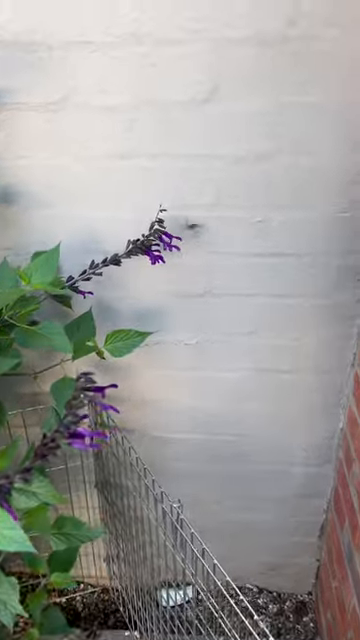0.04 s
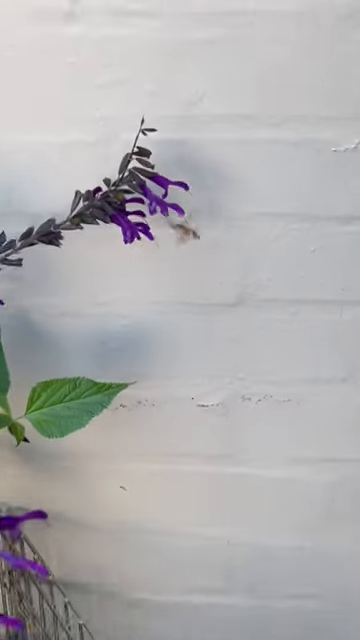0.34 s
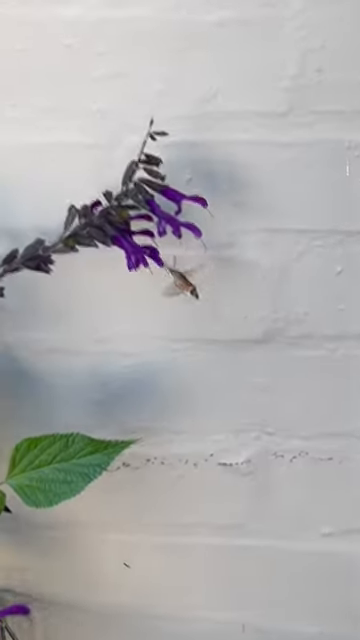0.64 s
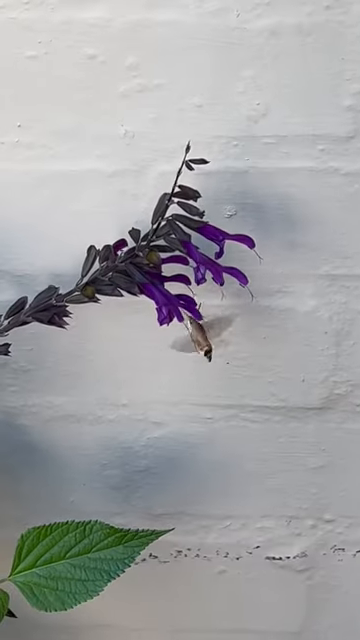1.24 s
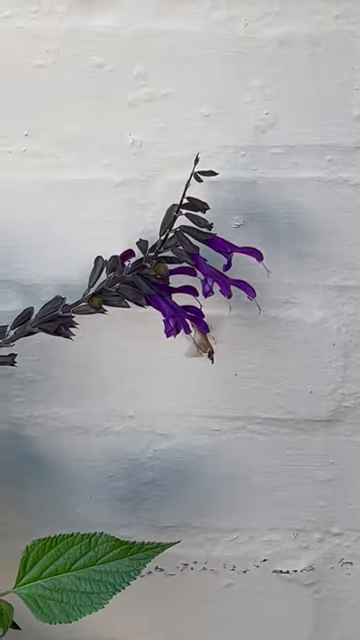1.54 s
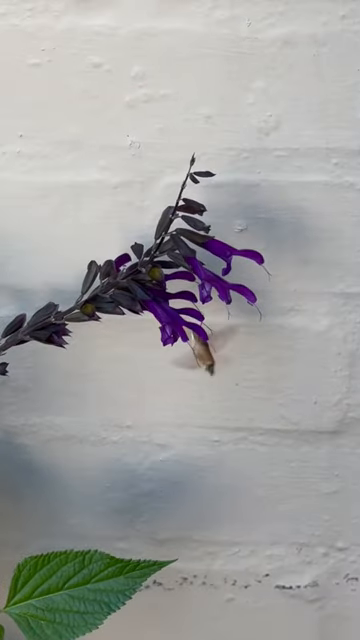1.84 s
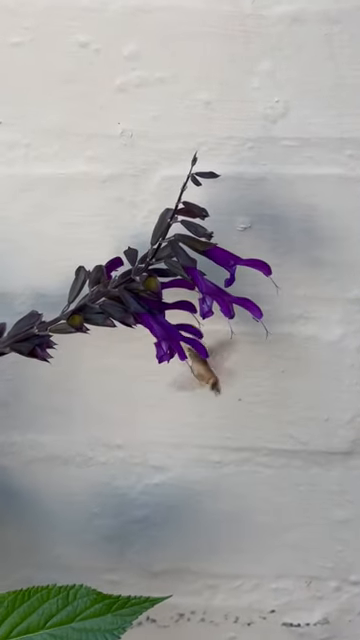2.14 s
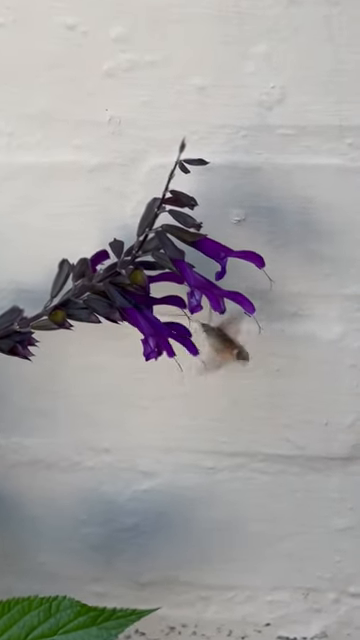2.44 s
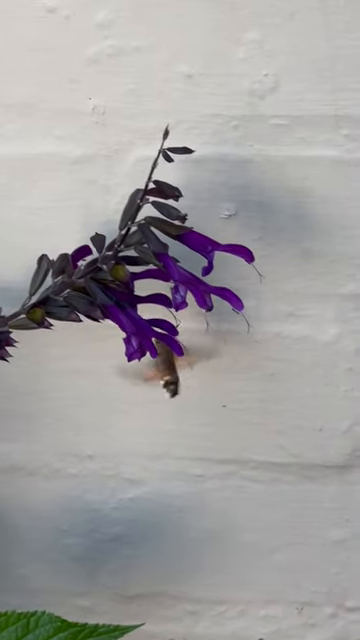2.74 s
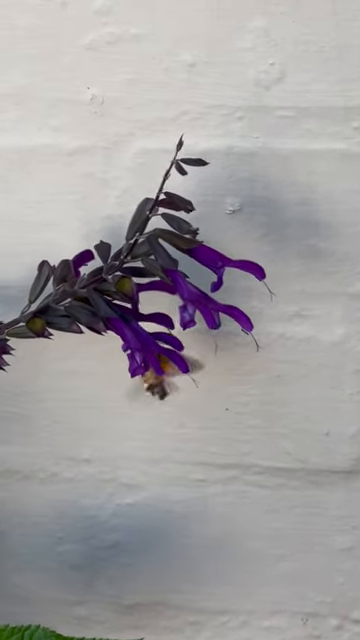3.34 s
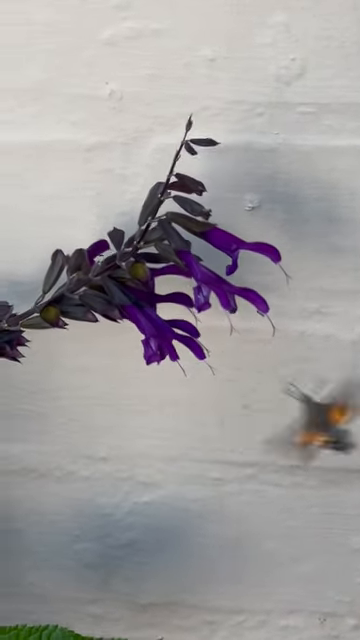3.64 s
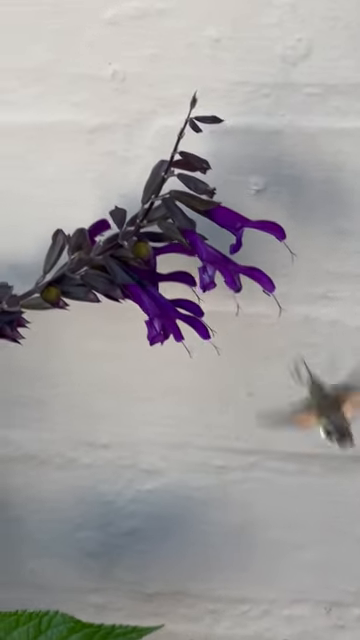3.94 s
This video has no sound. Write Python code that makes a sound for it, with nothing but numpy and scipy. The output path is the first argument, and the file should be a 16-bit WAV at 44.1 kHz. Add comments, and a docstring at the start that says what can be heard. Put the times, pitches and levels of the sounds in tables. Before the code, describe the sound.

A steady, deep rumble of far traffic fills a quiet garden beside a wall. After one small bump on the microphone, a hovering moth hums close by in short, soft swells toward the end, and leaves rustle very faintly.

```python
"""Hawk-moth in a quiet garden

Beside a brick wall lies a bed of distant traffic: deep engine rumble, a slowly swelling tyre wash and
one engine idling. A far machine hums and birds chirp very faintly. A finger bumps the microphone once.
Up close, leaves rustle and a hawk-moth hovers at a flower: its beating wings hum softly and now and
then brush the petals."""
import sys
import numpy as np
from scipy import signal
from scipy.fft import rfft, irfft
from scipy.io import wavfile
from scipy.ndimage import uniform_filter1d

SR = 44100
rng = np.random.default_rng(int(sys.argv[2]) if len(sys.argv) > 2 else 0)


def persist_wave(psi):
    """Save psi, clipped to +-1, as 16-bit WAV."""
    counts = np.round(np.clip(psi, -1, 1) * 32767).astype(np.int16)
    wavfile.write(sys.argv[1], SR, np.atleast_2d(counts).T)


N = 176400
TIME = np.arange(N) / SR
BINS_HZ = np.maximum(np.arange(N // 2 + 1) * SR / N, 1)

# stereo image beside the wall: f/Hz, left-right correlation, left minus right/dB, left lead/rad
WALL_IMAGE = [(30, .9993, -.15, 0), (65, .9988, -.3, 0), (120, .994, -1, 0), (170, .98, -1.8, 0),
              (240, .94, -2.7, -.05), (340, .72, .2, -.1), (450, .73, -.8, 0), (560, .87, -1.7, .25),
              (780, .69, -2.5, .85), (980, .43, 0, -.1), (1200, .63, -.2, .65), (1380, .05, -.6, -.3),
              (1550, .68, -4, .3), (1900, .98, -.2, 0), (2500, .997, 0, 0), (4800, .95, 0, 0),
              (5500, .72, -.2, -.9), (8000, .78, -.4, -1.2), (14000, .62, -.6, -1.2)]
# colour of the hiss: f/Hz, relative level/dB
HISS_SPECTRUM = [(1000, 3), (3500, 5), (5500, 0.5), (7000, 1), (8500, -0.5), (10500, -5.5), (13000, -5.5),
                 (15000, -15.5)]
# colour of the engine rumble: f/Hz, relative level/dB
RUMBLE_SPECTRUM = [(15, -51), (24, -27), (32, -12), (41, -8.5), (54, 2.5), (65, -9.5), (74, -3.5),
                   (98, -12.5), (128, -9), (165, -19.5), (205, -23.5), (320, -37), (600, -78), (900, -120)]
# fader ride of the rumble: t/s, level/dB
RUMBLE_LEVEL = [(0, -40), (1, -41), (2.2, -41), (2.75, -39), (3.2, -40), (4, -39.5)]
# colour of the tyre wash: f/Hz, relative level/dB
TYRE_SPECTRUM = [(120, -7), (300, -9.5), (430, -6), (510, -4), (555, -0.5), (700, -1.5), (800, 1),
                 (850, -3), (1150, -6), (1340, -11), (1580, -11), (1850, -20), (2300, -26.5), (3100, -41.5),
                 (4500, -91.5), (8000, -80.5)]
# fader ride of the tyre wash: t/s, level/dB
TYRE_LEVEL = [(0, -50.5), (.8, -50), (1.3, -50), (2.2, -49.5), (2.7, -48.5), (3.3, -48.5), (4, -48.5)]
# single far engines swelling: peak t/s, half length/s, level/dB, centre f/Hz, width/octaves
ENGINE_SWELLS = [(1.906, .22, -51, 132, 0.14), (2.72, 0.33, -44, 61, 0.11)]
# tones of the far machine: f/Hz, relative level/dB
MACHINE_TONES = [(183, -1), (350, -8), (398, -3.5)]
# fader ride of the machine: t/s, level/dB
MACHINE_LEVEL = [(0, -63), (.6, -58), (1, -69.5), (1.6, -66), (2, -59), (2.5, -73.5), (4, -66.5)]
# far bird chirps: peak t/s, half length/s, start f/Hz, end f/Hz, level/dB
CHIRPS = [(.19, .025, 3260, 3960, -92), (1.635, .035, 3940, 4160, -86), (1.87, .018, 3520, 3450, -89),
          (3.79, .04, 3400, 3200, -89)]
# modes of the microphone's case: f/Hz, relative level/dB
CASE_MODES = [(170, 4), (390, -5.5)]
# leaf rustles: peak t/s, attack/s, decay/s, level/dB, centre f/Hz, width/octaves
RUSTLES = [(.032, .001, .004, -76, 5000, 0.48), (.075, 0.049, 0.065, -85.5, 3670, 0.23),
           (.205, .015, .04, -94, 4020, 0.33), (.68, .04, .08, -93, 8200, 0.12),
           (1.635, 0.025, .03, -94, 4000, 0.26), (2.95, 0.15, 0.16, -89, 8330, 0.13),
           (3.07, 0.028, .03, -86.5, 4300, 0.67), (3.25, 0.056, 0.044, -84, 5440, 0.89),
           (3.412, 0.02, 0.017, -78.5, 8040, 0.23), (3.555, 0.05, .05, -86, 3500, .4),
           (3.751, 0.16, .15, -90, 3600, 0.54)]
# wings touching the petals: start t/s, length/s, level/dB
BRUSHES = [(1.14, .17, -89.8), (1.31, .13, -88.5), (1.37, .026, -83.5), (1.445, .05, -82),
           (1.53, .235, -82.3), (1.765, .085, -92), (1.85, .06, -87), (1.915, .04, -83.5),
           (1.975, .095, -83.8), (2.14, .035, -90.5), (2.64, .11, -95), (2.75, .05, -87.5), (2.8, .3, -88),
           (3.12, .16, -90.5), (3.37, .1, -86.5)]
# colour of wing on petal: f/Hz, relative level/dB
BRUSH_SPECTRUM = [(1500, -26), (3500, -5.5), (6700, -6.5), (7900, 4.5), (9400, -0.5), (10300, 2),
                  (11200, -2), (13000, -2.5), (15000, -7)]
# the moth's wingbeat rate: t/s, f/Hz
WINGBEAT = [(0, 74), (1.7, 75), (2.6, 72), (2.97, 74), (3.03, 81), (3.08, 81), (3.11, 73), (3.25, 74),
            (3.33, 78), (3.58, 78), (3.62, 72), (4, 72)]
# fader ride of the wing hum as the moth turns and nears: t/s, level/dB
WING_LEVEL = [(0, -75.5), (2.2, -70), (2.5, -64), (2.63, -53.5), (2.8, -71.5), (2.93, -67), (3.03, -51),
              (3.18, -47), (3.29, -60), (3.43, -55), (3.58, -53), (3.69, -47.5), (3.8, -65), (4, -60)]
# partials of the wing hum: harmonic number, relative level/dB
WING_PARTIALS = [(1, -4), (2, -11), (3, 1.5), (4, -21)]


def from_db(db):
    """Decibels to gain."""
    return 10 ** (np.asarray(db) / 20)


def unit_rms(x):
    """Scale to an rms of 1."""
    return x / np.sqrt(np.mean(x ** 2) + 1e-20)


def in_time(rows):
    """A (t/s, value) curve at every sample."""
    return np.interp(TIME, *np.transpose(rows))


def over_hz(rows):
    """Each value column of an (f/Hz, ...) table at every frequency bin."""
    hz, *columns = np.transpose(rows)
    return [np.interp(np.log(BINS_HZ), np.log(hz), c) for c in columns]


def phase_of(hz):
    """Running phase of a moving pitch."""
    return 2 * np.pi * np.cumsum(hz) / SR


def drift(rate_hz):
    """Smooth random modulation of rms 1, rolling off above rate_hz."""
    slow = irfft(rfft(rng.standard_normal(N)) / (1 + (BINS_HZ / rate_hz) ** 2), N)
    return unit_rms(slow - slow.mean())


def hump_db(hz, octaves):
    """A smooth band-pass curve around hz."""
    return -40 * np.log10(1 + (np.log2(BINS_HZ / hz) / octaves) ** 2 / 2)


def steadied(x, span_s):
    """Level out the swells of a stereo noise that are slower than span_s."""
    return x / np.sqrt(uniform_filter1d(np.mean(x ** 2, axis=0), int(span_s * SR)))


def garden_noise(colour_db):
    """Stereo noise of rms 1 in the given colour; the wall tints the two sides differently."""
    alike, balance_db, lead = over_hz(WALL_IMAGE)
    mid, side = rfft(rng.standard_normal((2, N)))
    sides = np.array([[1], [-1]])
    pair = np.sqrt(1 + alike) * mid + sides * np.sqrt(1 - alike) * side
    gain = from_db(colour_db + sides * balance_db / 2)
    return unit_rms(irfft(pair * gain * np.exp(.5j * sides * lead), N))


def hiss(level_db=-85.5):
    """A faint, even hiss under everything."""
    return from_db(level_db) * garden_noise(*over_hz(HISS_SPECTRUM))


def traffic():
    """Many far engines merge into a steady rumble under the wash of their tyres."""
    engines = steadied(garden_noise(*over_hz(RUMBLE_SPECTRUM)), span_s=.17)
    tyres = garden_noise(*over_hz(TYRE_SPECTRUM))
    return from_db(in_time(RUMBLE_LEVEL)) * engines + from_db(in_time(TYRE_LEVEL)) * tyres


def idling_engine(firing_hz=64.5, level_db=-44.5, wander_hz=1.7, waver_db=2.3):
    """The firing note of a far engine drones, unsteady on the air."""
    tone = np.sin(phase_of(firing_hz + wander_hz * drift(9.8)))
    return from_db(level_db) * unit_rms(tone * from_db(waver_db * drift(3.1)))


def engine_swells():
    """Now and then one engine booms up out of the rumble."""
    out = 0
    for peak, half, db, hz, octaves in ENGINE_SWELLS:
        swell = np.exp(-((TIME - peak) / half) ** 2)
        boom = steadied(garden_noise(hump_db(hz, octaves)), span_s=.12)
        out = out + from_db(db) * swell * boom
    return out


def machine(wander_hz=.88):
    """A far machine hums in a few thin tones that fade in and out on the air."""
    hum = 0
    for hz, db in MACHINE_TONES:
        tone = np.sin(phase_of(hz + wander_hz * drift(3.7)))
        hum = hum + from_db(db) * unit_rms(tone)
    return from_db(in_time(MACHINE_LEVEL)) * hum


def birds(waver_hz=170):
    """Very faint gliding chirps, blurred by distance."""
    out = 0
    for peak, half, start_hz, end_hz, db in CHIRPS:
        glide = np.interp(TIME, [peak - half, peak + half], [start_hz, end_hz])
        tone = np.sqrt(2) * np.sin(phase_of(glide + waver_hz * drift(150)))
        swell = np.exp(-((TIME - peak) / half) ** 2)
        out = out + from_db(db) * swell * tone
    return out


def finger_bump(start_s=.031, gain_db=-34, t60_s=.045):
    """A finger knocks the microphone's case, whose modes die away quickly."""
    age = np.maximum(TIME - start_s, 0)
    ring = sum(from_db(db) * np.sin(2 * np.pi * hz * age) for hz, db in CASE_MODES)
    return from_db(gain_db - 60 * age / t60_s) * ring


def leaves(grain_db=2):
    """Leaves slide over each other in short, grainy swishes."""
    out = 0
    for peak, attack, decay, db, hz, octaves in RUSTLES:
        swell = np.exp(-np.maximum((peak - TIME) / attack, (TIME - peak) / decay))
        grainy_gain = from_db(db + grain_db * drift(200))
        out = out + swell * grainy_gain * garden_noise(hump_db(hz, octaves))
    return out


def wing_brushes(phase, fade_s=.016, sharpness=.42, rough_db=1.3):
    """While a wing tip reaches the petals, each beat gives one tiny scuff."""
    contact = 0
    for start, length, db in BRUSHES:
        inside_s = np.minimum(TIME - start, start + length - TIME)
        contact = contact + from_db(db) * np.clip(inside_s / fade_s + .5, 0, 1)
    pulses = np.exp(sharpness * np.cos(phase))
    scuffs = unit_rms(pulses * from_db(rough_db * drift(60)))
    return contact * scuffs * garden_noise(*over_hz(BRUSH_SPECTRUM))


def wing_hum(phase, waver_db=2.6, flutter_depth=.42, flutter_hz=42):
    """The beating wings push out a few soft harmonics, each smeared by uneven strokes."""
    hum = 0
    for harmonic, db in WING_PARTIALS:
        flutter = flutter_depth * drift(flutter_hz) * np.cos(harmonic * phase)
        partial = from_db(waver_db * drift(flutter_hz)) * np.sin(harmonic * phase)
        hum = hum + from_db(db) * (partial + flutter)
    return from_db(in_time(WING_LEVEL)) * hum


def moth(jitter_hz=1.3):
    """One slightly unsteady wingbeat drives both the hum and the scuffs."""
    phase = phase_of(in_time(WINGBEAT) + jitter_hz * drift(30))
    return wing_hum(phase) + wing_brushes(phase)


def scene():
    """Lay down the hiss and the distant bed, then the close sounds on top."""
    bed = hiss() + traffic() + idling_engine() + engine_swells() + machine() + birds()
    return bed + finger_bump() + leaves() + moth()


def record(dry, low_cut_hz=27, high_cut_hz=14700):
    """The microphone loses the deepest bass; the top is cut steeply."""
    heard = irfft(rfft(dry) / np.sqrt(1 + (low_cut_hz / BINS_HZ) ** 8), N)
    high_cut = signal.ellip(10, .1, 80, high_cut_hz, fs=SR, output="sos")
    return signal.sosfilt(high_cut, heard)


dry = scene()
out = record(dry)
persist_wave(out)
```